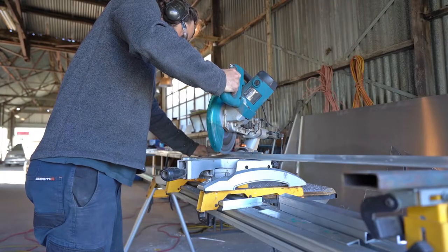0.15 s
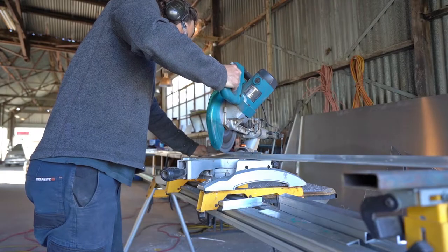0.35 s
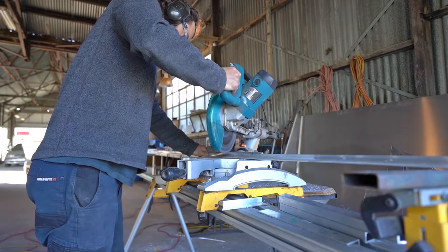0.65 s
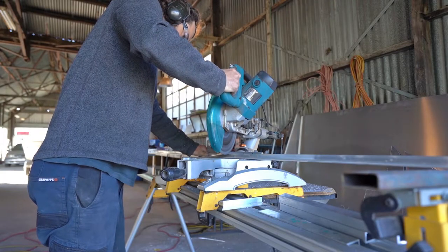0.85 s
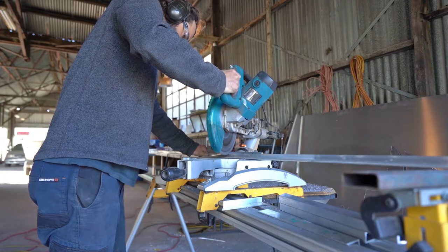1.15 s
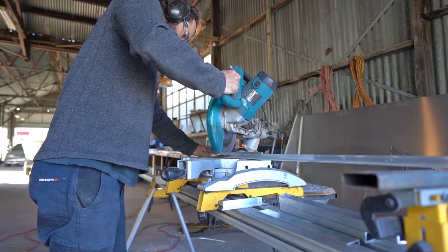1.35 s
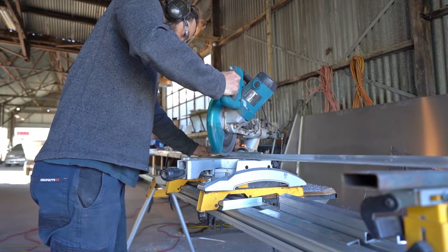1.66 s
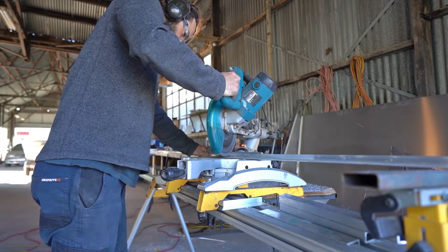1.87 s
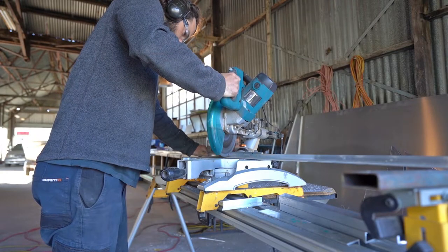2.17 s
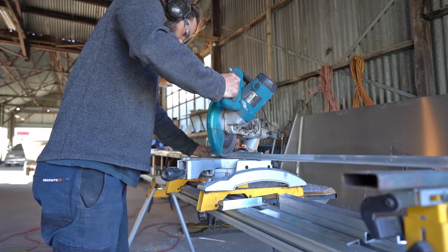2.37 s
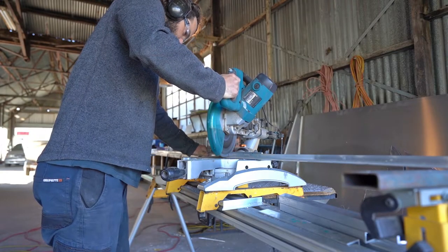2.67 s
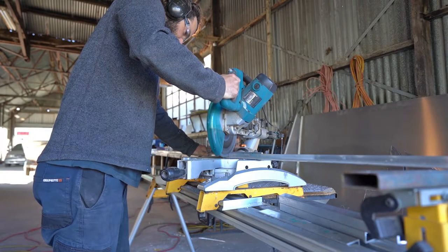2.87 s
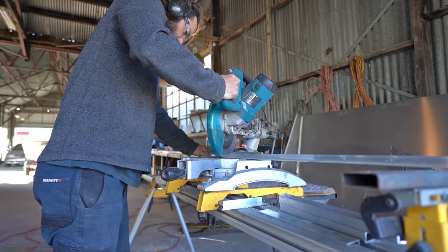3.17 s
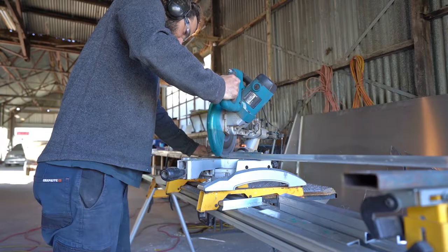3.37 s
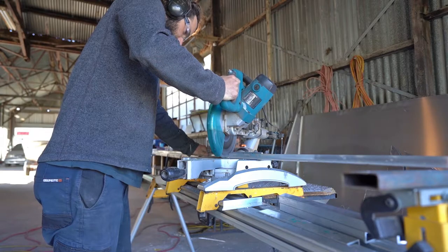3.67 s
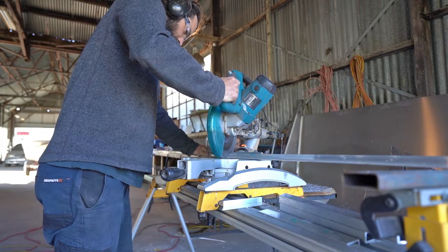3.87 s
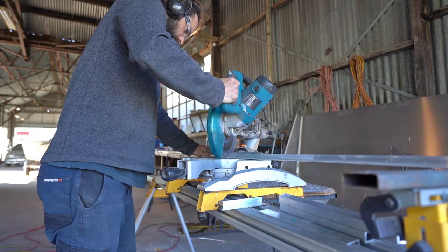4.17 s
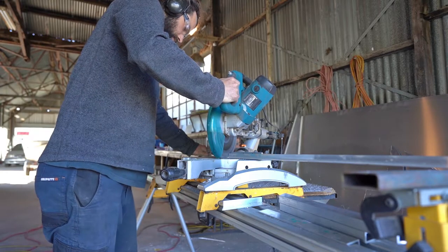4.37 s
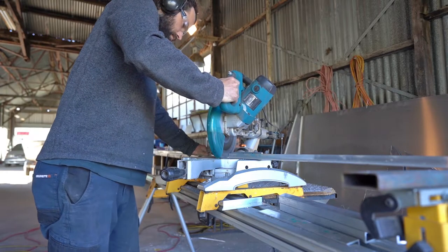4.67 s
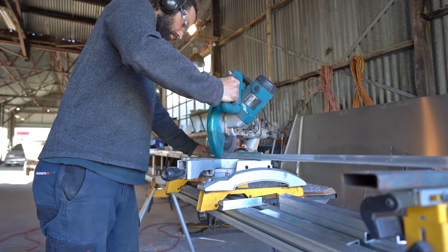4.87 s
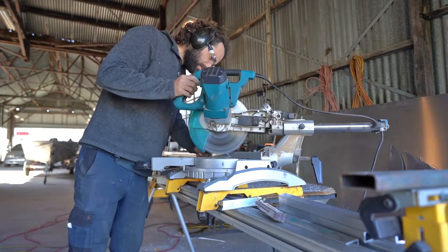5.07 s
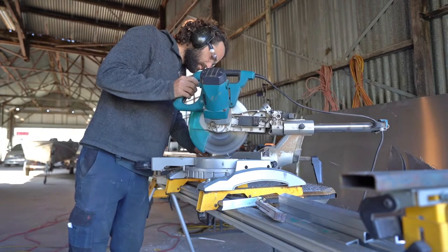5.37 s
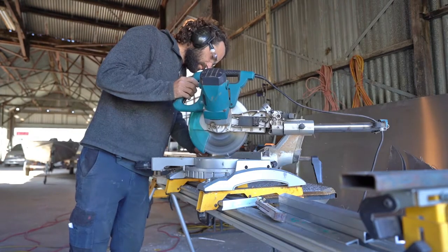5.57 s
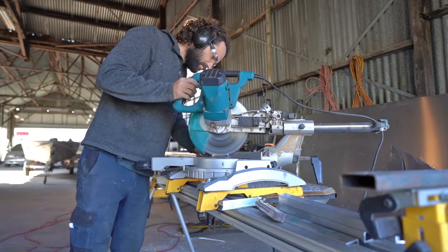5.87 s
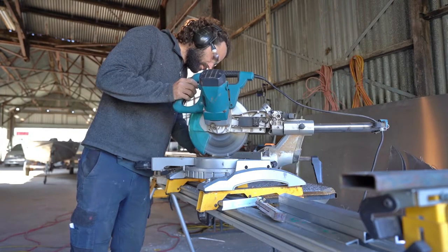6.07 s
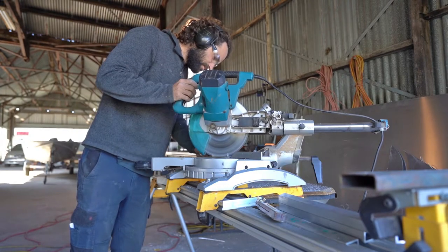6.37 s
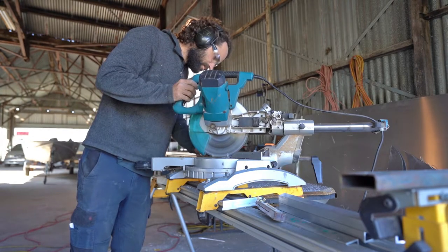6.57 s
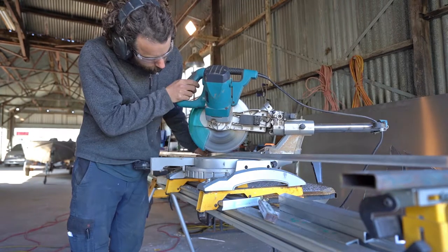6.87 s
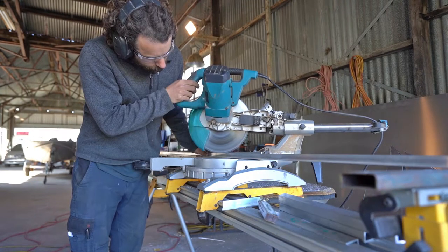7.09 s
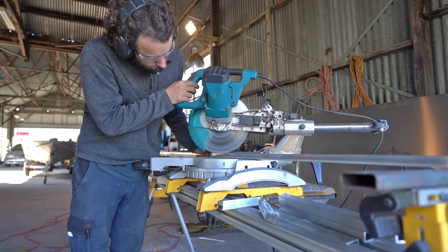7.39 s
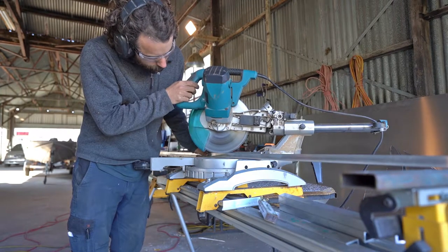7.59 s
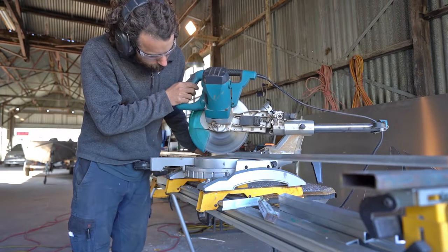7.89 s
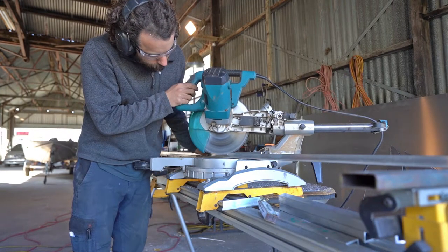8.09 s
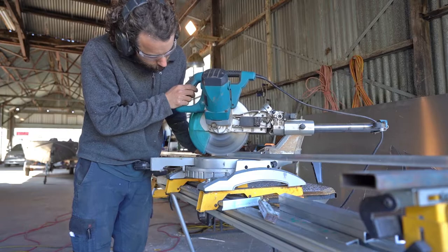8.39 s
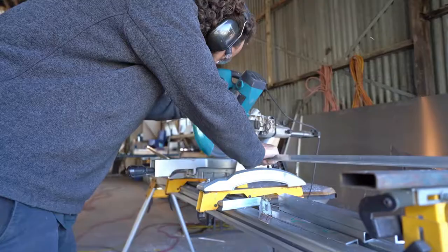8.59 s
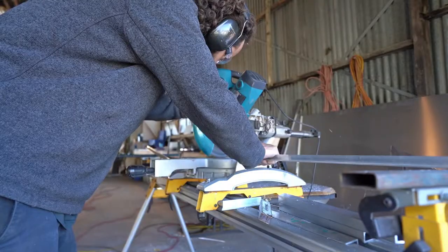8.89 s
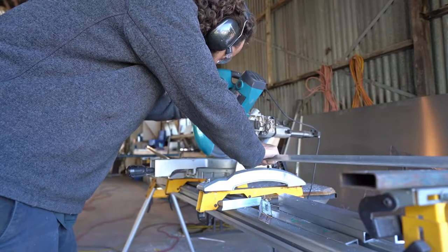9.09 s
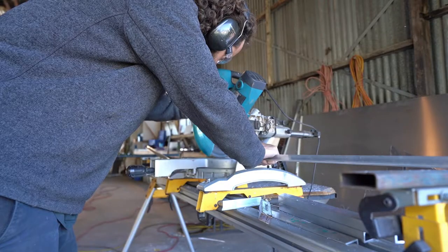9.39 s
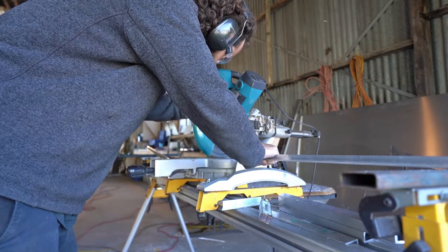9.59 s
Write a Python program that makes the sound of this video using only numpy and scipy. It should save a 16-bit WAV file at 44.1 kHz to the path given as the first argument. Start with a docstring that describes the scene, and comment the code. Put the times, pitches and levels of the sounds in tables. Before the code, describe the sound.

Close in a big metal shed, a mitre saw opens with a grazing shriek, roars free, then bites aluminium in a long, piercing, fluttering screech. It pulls clear and brakes downward, cuts abruptly to another squealing pass, idles with a whining roar, grazes the tube, screams through again, and ends on a rougher, lower squeal.

```python
"""A grazing shriek and a burst of squeal open six joined passes of a mitre saw in aluminium tube, in a big shed.
Behind them the motor fan roars as filtered noise and the motor whines at multiples of blade speed.
An 80-tooth blade sings at its tooth rate, its rim hisses in air and in metal, chips add a brighter hiss,
and blade and tube squeal in their modes. Once, the brake runs the blade down; at times it grazes the work.
Gain control ducks the motor under the cut."""
import sys
import numpy as np
from scipy import signal
from scipy.fft import rfft, irfft, next_fast_len
from scipy.io import wavfile
from scipy.ndimage import uniform_filter1d, map_coordinates

SR = 44100
rng = np.random.default_rng(int(sys.argv[2]) if len(sys.argv) > 2 else 0)


def generate_wav(sig):
    """Save sig (samples, or channels by samples) to the path in sys.argv[1] as 16-bit PCM at SR."""
    pcm = np.round(np.clip(np.atleast_2d(sig).T, -1, 1) * 32767).astype(np.int16)
    wavfile.write(sys.argv[1], SR, pcm)


N = 429534

# blade speed, gliding by equal ratios; it sags in the metal, dies under the brake, jumps at joins:
# (time [s], speed [turns per s])
BLADE_SPEED = [(0, 59), (.5, 64), (.9, 67.2), (1.22, 67.5), (2.6, 68.15), (3, 66.9), (3.85, 61.5),
               (4.44, 66.5), (4.53, 48.6), (5.045, 17), (5.055, 60.5), (5.6, 63.7), (6.35, 66.2),
               (6.665, 66.3), (6.675, 62), (7, 65.2), (7.33, 67.6), (7.52, 67.6), (7.6, 69.6), (8.3, 67.7),
               (8.585, 67.3), (8.595, 72.5), (9.1, 71.5), (9.74, 68.1)]
# motor, gear and brush notes while the motor drives: (multiple of blade speed, width [Hz], level [dB])
MOTOR_NOTES = [(1, 3, -57), (4.636, 10, -43), (55.6, 15, -28.5), (74, 15, -39), (148, 21, -49),
               (166.5, 35, -41.5), (188, 80, -46), (222, 70, -44)]
# brief notes that ride the blade speed, most under the brake:
# (start [s], end [s], multiple of blade speed, width [Hz], level [dB])
BRIEF_NOTES = [(0.043, .22, 160, 90, -3.5), (4.442, 4.56, 145, 1400, -19), (4.5, 4.843, 37, 45, -27.5),
               (4.53, 4.7, 74, 40, -36), (4.52, 4.74, 193, 1304, -22.5), (4.56, 4.69, 197, 697, -24),
               (4.57, 4.75, 338, 60, -40), (4.82, 4.992, 74, 45, -28.5), (4.882, 4.96, 47, 41, -31)]
# a mode of blade or tube sings for a while: (start [s], end [s], pitch [Hz], level over the rim's hiss [dB])
SQUEAL_NOTES = [(.1, .33, 8850, -15), (.15, .39, 6900, -11), (.05, .3, 7130, -12), (.92, 1.5, 8030, -10),
                (.92, 3.1, 1888, -16.5), (.92, 1.9, 1200, -19), (.95, 2.07, 4393, -10.5),
                (.95, 2.5, 9650, -13), (1, 2.56, 10070, -18), (1, 2.5, 3655, -23), (1.05, 2, 6760, -9.5),
                (1.05, 4.2, 7015, -11), (1.4, 2.1, 3590, -9.5), (1.45, 2.1, 3320, -11), (1.5, 2, 3800, -15),
                (1.6, 3.8, 7200, -13), (2, 2.8, 4362, -6.5), (2, 4.08, 4415, -13), (2, 4.08, 3100, -16),
                (2.1, 4.08, 4495, -15), (2.25, 2.65, 2727, -13.5), (2.3, 3.8, 8700, -17),
                (2.7, 2.97, 1888, -14.5), (2.8, 4.1, 8450, -12.5), (3.3, 4.1, 8930, -13),
                (3.7, 4.05, 3680, -14), (5.055, 6.67, 8450, -9), (5.06, 5.8, 2690, -15),
                (5.8, 6.67, 2708, -12.5), (5.06, 5.9, 3892, -16.5), (5.9, 6.67, 3892, -13),
                (5.06, 6.1, 3348, -16.5), (5.1, 6.6, 10140, -20), (5.2, 6.67, 6800, -7),
                (5.25, 6.1, 4503, -11.5), (5.25, 7.5, 6985, -11), (5.3, 6.05, 3575, -18),
                (5.3, 6.67, 5110, -14), (5.3, 7.1, 5820, -12), (5.5, 6.5, 6400, -10.5),
                (5.8, 6.67, 4895, -12.5), (7.55, 8.1, 9670, -10), (7.6, 8, 3582, -14),
                (7.75, 8.59, 2750, -12.5), (7.75, 8.59, 4400, -10.5), (7.75, 8.59, 5130, -10),
                (7.9, 8.4, 4905, -10), (7.9, 8.59, 6840, -16), (8.1, 8.59, 8510, -11),
                (8.59, 9.15, 2476, -3.5), (8.59, 9.15, 2762, -7), (8.59, 9.15, 3047, -8),
                (8.6, 9.74, 4420, -12.5), (8.6, 8.9, 8600, -15)]
# broad rings of the tube throughout, following the rim's hiss:
# (pitch [Hz], width [Hz], level over the rim's hiss [dB])
TUBE_RINGS = [(1032, 90, -20), (1558, 55, -23), (8500, 150, -13), (9360, 120, -22), (11750, 150, -22.5),
              (13200, 130, -25)]
# the blade's high side grazes the work once a turn:
# (time [s], turns in a row, relative strength [dB], lower ring against upper [dB])
GRAZE_RUNS = [(.04, 2, 16, -15), (.1256, 1, 11, -11.5), (.1605, 1, 10, -10), (.2117, 2, 13, -8),
              (.2611, 1, 11, -10.5), (.3571, 12, -10, 2), (.7307, 1, -5.5, -6.5), (0.9053, 1, 5, 0),
              (.92, 10, -4, -10), (3.9345, 1, 10, -3.5), (4.1979, 1, -5, -3), (4.4423, 1, -1, -10),
              (4.8684, 1, -14, -3), (4.9117, 2, -5, 3.5), (5.009, 1, -5.5, -3), (6.8244, 1, -8, 3),
              (7.3507, 6, 5, -6), (7.5433, 15, 1, -7), (8.9989, 1, -4, -8)]
# modes of the free blade: (pitch [Hz], width [Hz], relative gain [dB])
BLADE_MODES = [(3110, 66, 7.5), (3530, 91, 0.5), (4130, 83, 6), (4680, 93, 7), (5294, 122, 7),
               (6000, 83, 0), (6270, 111, 5.5), (7640, 170, 3), (7840, 203, 2), (8520, 95, 6),
               (9310, 276, 0.5), (10900, 195, -24), (12570, 290, -14.5), (13460, 246, -5.5)]
# the rim's hiss, air when the blade runs free, tearing metal when it bites:
# (time [s], relative hiss level [dB], tooth note over the hiss [dB])
RIM_HISS = [(.035, -18, -36), (.045, -3, -8), (.2, -2.5, -12), (.27, -6, -13), (.34, -14, -20),
            (.45, -19, -32), (.895, -19.5, -32), (.905, -9, -0.5), (1.3, -7, 0), (1.9, -7, -2),
            (2.2, -10, -9), (2.6, -4, -7), (2.9, -8, -26), (3.2, -4, -4.5), (3.5, -6.5, -24),
            (3.85, -4, -15), (4.03, -4, -24), (4.1, -13, -30), (4.435, -22, -35), (4.445, -13, -40),
            (4.52, -13, -40), (4.6, -22, -40), (4.75, -21.5, -40), (4.93, -19.5, -38), (5.045, -13, -40),
            (5.055, -8.5, -16), (5.5, -7, -8), (6.1, -9, -14), (6.665, -10.5, -12), (6.675, -18, -35),
            (7, -17.5, -30), (7.345, -18, -33), (7.42, -9.5, -6), (7.52, -16.5, -9), (7.7, -5, -1.5),
            (8, -4, -4.5), (8.4, -3.5, -3), (8.585, -6.5, -3.5), (8.595, -13, -11), (9, -16, -10),
            (9.3, -10.5, -6.5), (9.74, -13.5, -9)]
# noise colours, shape only: (frequency [Hz], relative density [dB per Hz])
FAN_COLOUR = [(82, -66), (140, -38), (297, -12), (362, -15), (441, 1), (1140, -5), (1280, -5.5), (3590, -7),
              (3960, -14.5), (5440, -14), (8740, -21), (10200, -39), (12700, -21.5), (14300, -40),
              (15800, -46.5)]
STAND_COLOUR = [(15, -7), (26, 2.5), (60, -14), (130, -16), (200, -31.5)]
HISS_COLOUR = [(710, -24), (1200, -9.5), (1660, -8.5), (3650, -2.5), (4120, -2), (4430, -1), (4820, -5.5),
               (5290, 1.5), (5800, -2), (8490, -1), (11000, -19.5), (14300, -31), (22000, -120)]
CHIP_COLOUR = [(5000, -36.5), (8500, -2.5), (9120, -4), (9990, -5.5), (10800, -8.5), (13200, -5.5),
               (15100, -12.5), (15800, -20)]
# how long the shed rings: (frequency [Hz], 60 dB decay time [s])
SHED_DECAY = [(300, 1.17), (3000, 0.84), (12000, 0.33)]
# where one pass is joined to the next: (time [s])
PASS_JOINS = [.04, .9, 5.05, 6.67, 8.59]
# how near the motor is in each pass, heard in its fan roar: (level [dB])
FAN_NEARNESS = [2, 2.2, -2.5, 0.3, 2, -0.3]

TOOTH_COUNT = 80
FULL_SPEED = 67  # turns per s
START_TURN = -.33  # where the blade's high side stands at the start, turns
BRAKE_ON_S, BRAKE_OFF_S = 4.44, 5.05
FAN_DB, FAN_POWER = -13.5, 1.42  # roar at full speed; it grows as this power of speed
SHAKE_DB = -48  # shake through the stand
OVERTONES_DB = -14.5  # the tooth note's overtones (octave and twelfth above), relative to the note
# once-a-turn throb when the tooth note equals the hiss; change per dB of tooth note over the hiss
THROB_DB, THROB_PER_DB = 5.5, 0.24
# chips follow the rim's hiss and the tooth note over it, and die with speed
CHIPS_DB, CHIPS_GROW, CHIPS_TEETH, CHIPS_POWER = -8, 0.84, 0.15, 1.1
SQUEAL_WIDTH_HZ, WIDTH_POWER = 16, 1.6  # width at 4 kHz; it grows as this power of pitch
GRAZE_LOSS_DB = 0.1  # each further turn touches lighter
CEILING_DB, REACH_S = -13, 0.11  # gain control: level it holds loud sound to, span it listens over
TOP_HZ = 15950  # band limit


def amp(db):
    """Decibels to a linear factor."""
    return 10 ** (np.asarray(db) / 20)


def unit(x):
    """x scaled to rms 1."""
    return x / np.sqrt(np.mean(np.abs(x) ** 2) + 1e-20)


def along(points, hz):
    """(Hz, value) points read on a log frequency axis."""
    f, v = np.transpose(points)
    return np.interp(np.log(hz + 1), np.log(f + 1), v)


def curves(rows):
    """One value per sample for each column after the time."""
    s, *columns = np.transpose(rows)
    return [np.interp(np.arange(N) / SR, s, column) for column in columns]


def wobble(rate, count=N):
    """A smooth random curve, rate knots a second."""
    knots = np.arange(0, count * rate / SR + 1, 1 / 6)
    smooth = map_coordinates(rng.standard_normal(int(count * rate / SR) + 4), [knots])
    return np.interp(np.arange(count) * rate / SR, knots, smooth)


def filtered(x, response):
    """x times a complex response of frequency, padded so that the ring does not wrap round."""
    m = next_fast_len(N + SR // 2)
    return irfft(rfft(x, m) * response(np.fft.rfftfreq(m, 1 / SR)), m)[..., :N]


def rush(colour, patchy_db):
    """Coloured noise of rms 1 whose narrow bands swell and fade for a while."""
    z = signal.stft(rng.standard_normal(N + 2048), nperseg=1024)[2]
    across_bands = uniform_filter1d(rng.standard_normal(z.shape), 2, 0)
    patches = unit(uniform_filter1d(across_bands, 30, 1))
    noise = signal.istft(z * amp(patchy_db * patches), nperseg=1024)[1][:N]
    return unit(filtered(noise, lambda hz: amp(along(colour, hz))))


def singing(start, end, phase, width_hz, db, waver_db):
    """A note from start to end: a narrow mode holds a steady tone, a wide one is a band of noise."""
    a, b = round(start * SR), min(round(end * SR), N)
    count = b - a
    t = np.arange(count) / SR
    rough = np.clip(width_hz / 70, 0, 1)
    sway = unit(wobble(width_hz + 8, count) + 1j * wobble(width_hz + 8, count))
    drift = np.exp(1.5j * wobble(width_hz / 2 + 2, count))
    edge = np.clip(np.minimum(t / 0.0036, (t[-1] - t) / 0.046), 0, 1)
    fade_db = 1.75 * t / t[-1]  # a note fades a little as it lasts
    level = amp(db + 3 + waver_db * wobble(6.89, count) - fade_db) * edge  # 3 dB: peak over rms of a tone
    note = (np.sqrt(1 - rough) * drift + np.sqrt(rough) * sway) * np.exp(1j * phase[a:b])
    return np.pad(level * note.real, (a, N - b))


def blade_speed():
    """Turns a second at each sample, interpolated as ratios."""
    s, turns = np.transpose(BLADE_SPEED)
    return np.exp(np.interp(np.arange(N) / SR, s, np.log(turns)))


def throb(angle, depth_db):
    """Runout presses the blade in once a turn, quick to bite and slower to let go; mean power stays near 1."""
    gain = amp(depth_db * (np.sin(angle) + 0.38 * np.sin(2 * angle)))
    return gain / np.sqrt(np.abs(uniform_filter1d(gain ** 2, SR // 16)) + 1e-9)


def shed(x):
    """The shed answers a moment late with a noise tail; each frequency dies at its own speed."""
    hz, t, z = signal.stft(rng.standard_normal(SR), SR, nperseg=256)
    decay = amp(-60 * t / along(SHED_DECAY, hz)[:, None])
    tail = signal.istft(z * decay, SR, nperseg=256)[1]
    late = np.pad(x, (700, 0))  # samples of delay
    return signal.fftconvolve(late, tail / np.linalg.norm(tail))[:N]


def motor(angle, fan_db):
    """The fan churns air into a roar, notes follow multiples of the speed, and the stand shakes low."""
    roar = amp(fan_db + 0.704 * wobble(12)) * rush(FAN_COLOUR, patchy_db=2)
    driven = [(0, BRAKE_ON_S), (BRAKE_OFF_S, N / SR)]
    steady = [(start, end, *note) for note in MOTOR_NOTES for start, end in driven]
    notes = sum(singing(start, end, multiple * angle, width_hz, db, waver_db=2.0)
                for start, end, multiple, width_hz, db in steady + BRIEF_NOTES)
    shake = amp(SHAKE_DB + 4.4 * wobble(3)) * rush(STAND_COLOUR, patchy_db=2.5)
    return roar + notes + shake


def grazes(angle, speed):
    """A short scrape rings the blade; its upper and lower modes take their own strength."""
    high, low = np.zeros(N + SR), np.zeros(N + SR)
    t = np.arange(SR // 10) / SR
    for s, db, low_db in touches(angle):
        at = round(s * SR)
        t60 = 1.5 / speed[at]  # a slower blade rubs longer
        scrape = rng.standard_normal(len(t)) * amp(-60 * t / t60) * (1 - np.exp(-t / (t60 / 60)))
        high[at:][:len(t)] += amp(db) * scrape
        low[at:][:len(t)] += amp(db + low_db) * scrape

    def ring(f):
        """The direct scrape plus every mode as a resonance."""
        modes = sum(amp(db) * 1j * f * w / (c * c - f * f + 1j * f * w) for c, w, db in BLADE_MODES)
        return amp(-13.5) + modes

    def above(f, edge_hz):
        """Steep high-pass."""
        return 1 / (1 + (edge_hz / (f + 1)) ** 12)

    upper = filtered(high[:N], lambda f: ring(f) * above(f, 7250))
    lower = filtered(low[:N], lambda f: ring(f) * above(f, 2900) * (1 - above(f, 7250)))
    return amp(2) * (upper + lower)


def touches(angle):
    """(time [s], strength [dB], lower ring [dB]) of every single graze, one turn apart."""
    def after(s, turns):
        """The time so many turns after s."""
        return np.searchsorted(angle, angle[round(s * SR)] + 2 * np.pi * turns) / SR

    return [(after(s, k), db - GRAZE_LOSS_DB * k, low_db)
            for s, run, db, low_db in GRAZE_RUNS for k in range(round(run))]


def squeals(angle, hiss_db, depth_db):
    """Modes of blade and tube sing near their own pitches, rising and falling with the rim's hiss."""
    turns = 2 * np.pi * np.arange(N) / SR  # phase of a 1 Hz tone
    rows = [(start, end, hz, SQUEAL_WIDTH_HZ * (hz / 4000) ** WIDTH_POWER, db)
            for start, end, hz, db in SQUEAL_NOTES]
    rows += [(0, N / SR, *ring) for ring in TUBE_RINGS]
    notes = sum(singing(start, end, hz * turns, width_hz, db, waver_db=1.5)
                for start, end, hz, width_hz, db in rows)
    return amp(hiss_db) * notes * throb(angle, 0.29 * depth_db)


def teeth(angle, note_db, overtones_db, depth_db):
    """Each tooth strikes in turn; runout splits the note into lines one turn apart."""
    phase = TOOTH_COUNT * angle + .5 * np.sin(angle + 0.67) + 0.33 * wobble(30)
    flutter_db = 9 / (2 + depth_db)  # a shallow throb flutters, a deep one holds steady
    note = amp(note_db + flutter_db * wobble(18)) * np.sin(phase)
    octave_and_twelfth = np.sin(2 * phase) + amp(-5) * np.sin(3 * phase)
    overtones = amp(overtones_db + 1.43 * flutter_db * wobble(25)) * octave_and_twelfth
    return np.sqrt(2) * (note + overtones) * throb(angle, 1.4 * depth_db)


def rim(angle, turns_kept):
    """Uneven teeth return every turn, so part of the hiss repeats, changing over a few turns."""
    turn = angle / (2 * np.pi)
    pattern = rng.standard_normal((int(turn[-1] / turns_kept) + 4, 600))
    repeated = map_coordinates(pattern, [turn / turns_kept, turn % 1 * 599], order=1)
    return unit(filtered(repeated, lambda hz: amp(along(HISS_COLOUR, hz))))


def rim_and_chips(angle, hiss_db, chips_db, depth_db):
    """The rim hisses, in air when free and in tearing metal when it bites; chips hiss brighter and spikier."""
    repeat_share = np.clip(0.16 * depth_db, 0, 1.2)
    noise = rush(HISS_COLOUR, patchy_db=3) + repeat_share * rim(angle, turns_kept=10)
    hiss = amp(hiss_db - 3.5 + 1.13 * wobble(25)) * noise * throb(angle, 0.33 * depth_db)
    spikes = unit(amp(1.2 * wobble(500) + 1.2 * wobble(30)))
    chips = amp(chips_db) * spikes * rush(CHIP_COLOUR, patchy_db=4.0) * throb(angle, 0.34 * depth_db)
    return hiss + chips


def held(x):
    """Gain control within one pass: whatever is louder than the ceiling is turned down to it."""
    reach = max(round(REACH_S * SR / 2), 8)
    power = np.abs(uniform_filter1d(uniform_filter1d(x ** 2, reach), reach))
    return x / (1 + (power / amp(2 * CEILING_DB)) ** 3) ** (1 / 6)


def scene():
    """One turning blade drives every layer; the shed answers the teeth and the grazes."""
    speed = blade_speed()
    angle = 2 * np.pi * (START_TURN + np.cumsum(speed) / SR)
    speed_db = 20 * np.log10(speed / FULL_SPEED)
    hiss_db, over_db = curves(RIM_HISS)
    note_db = hiss_db + over_db
    depth_db = np.clip(THROB_DB + THROB_PER_DB * over_db, 0, 9)
    chips_db = CHIPS_DB + CHIPS_GROW * hiss_db + CHIPS_TEETH * over_db + CHIPS_POWER * speed_db
    near_db = np.array(FAN_NEARNESS)[np.searchsorted(PASS_JOINS, np.arange(N) / SR)]

    mono = motor(angle, FAN_DB + near_db + FAN_POWER * speed_db)
    sharp = grazes(angle, speed) + teeth(angle, note_db, note_db + OVERTONES_DB, depth_db)
    mono = mono + sharp + amp(-11.5) * shed(sharp)
    mono = mono + squeals(angle, hiss_db, depth_db) + rim_and_chips(angle, hiss_db, chips_db, depth_db)
    return np.array([mono, mono])


def record(dry):
    """Gain control pass by pass; peaks round off near full scale; nothing passes above the band limit."""
    joins = np.round(np.multiply(PASS_JOINS, SR)).astype(int)
    level = np.hstack([held(x) for x in np.split(dry, joins, axis=1)])
    soft = level / (1 + np.abs(level / 1.05) ** 6) ** (1 / 6)
    return np.clip(filtered(soft, lambda hz: hz < TOP_HZ), -1, 1)


dry = scene()
out = record(dry)
generate_wav(out)
```